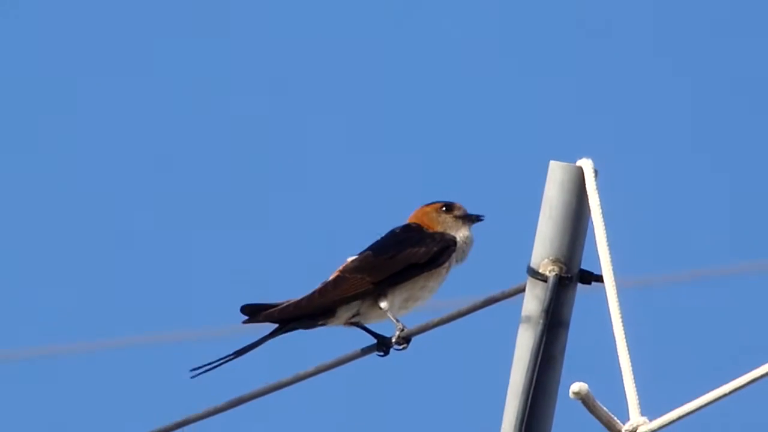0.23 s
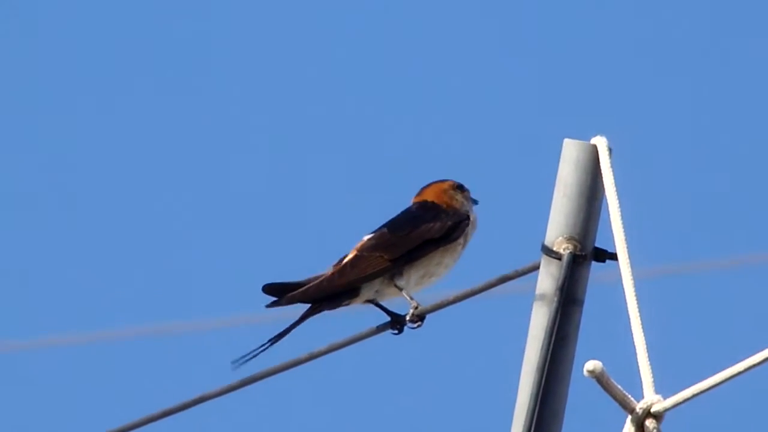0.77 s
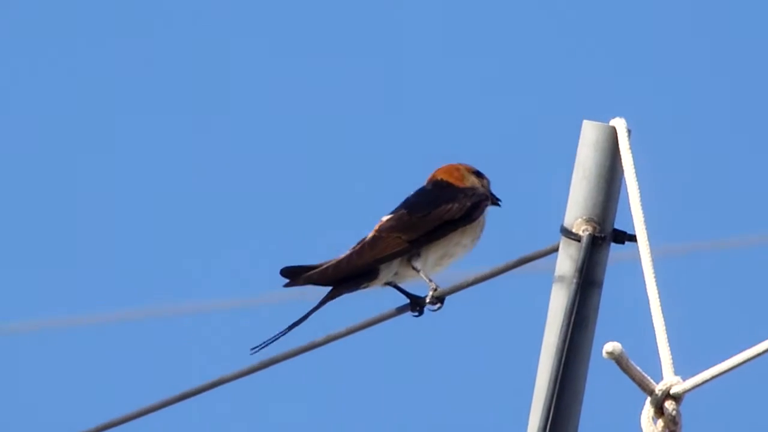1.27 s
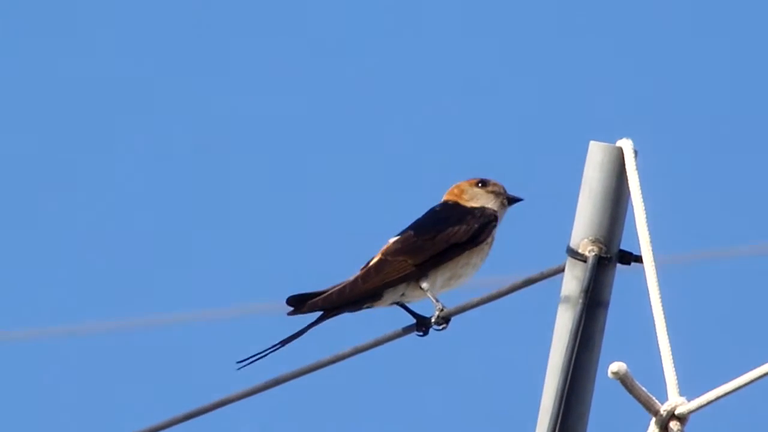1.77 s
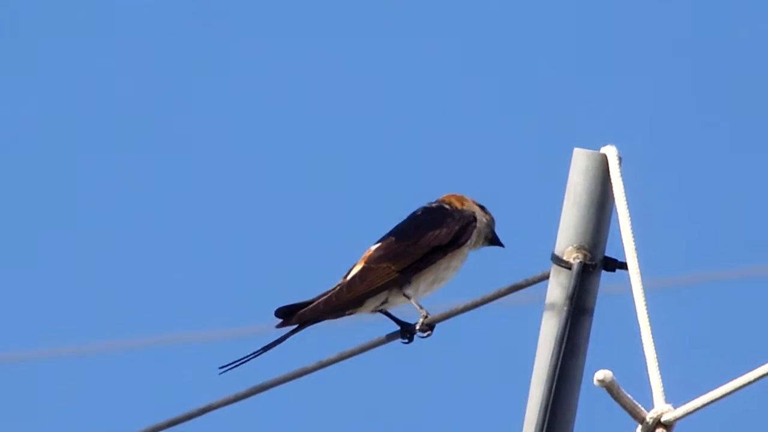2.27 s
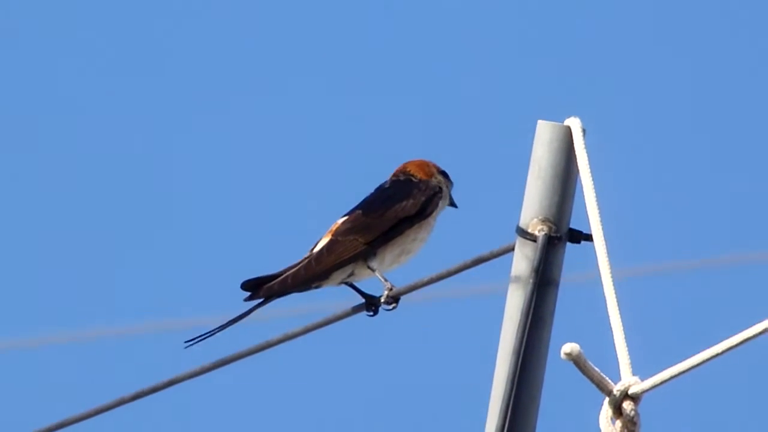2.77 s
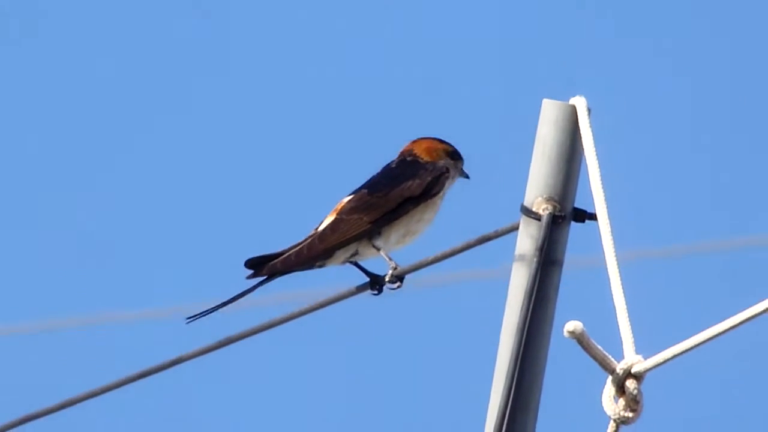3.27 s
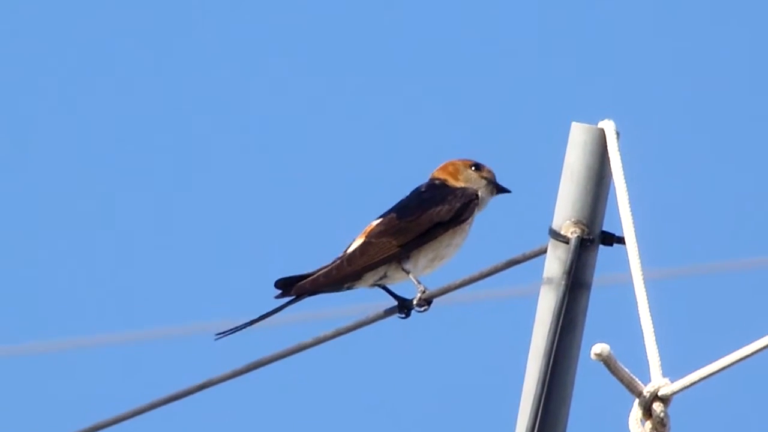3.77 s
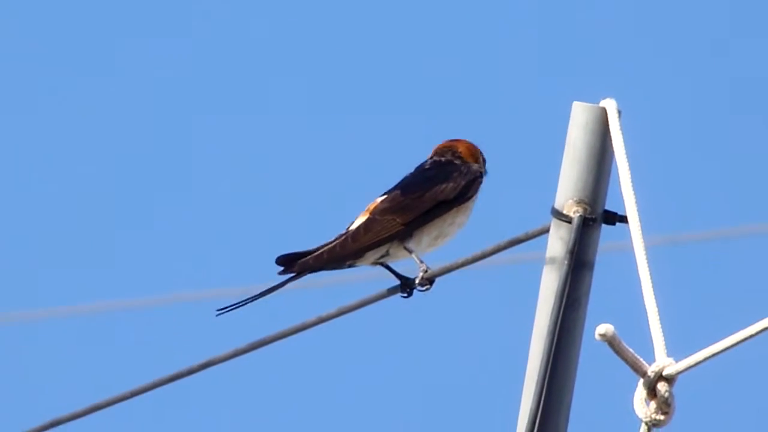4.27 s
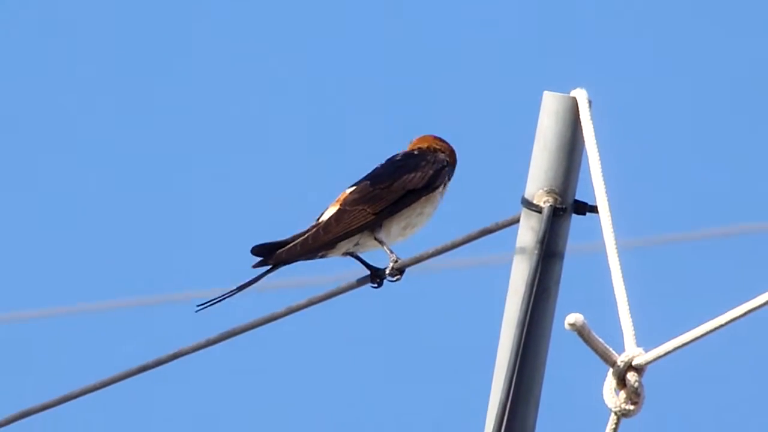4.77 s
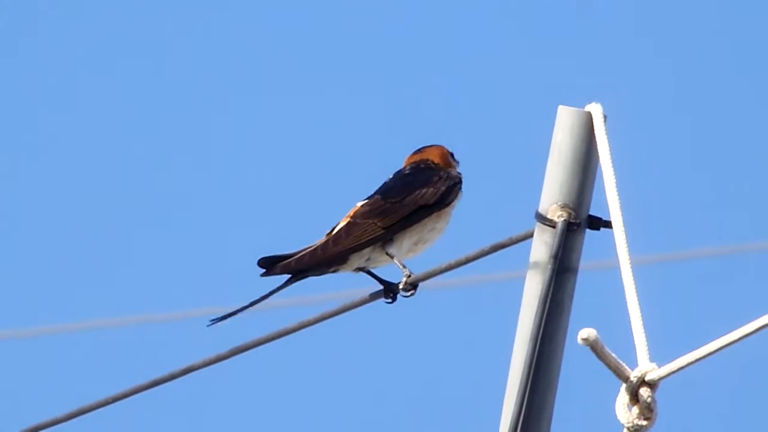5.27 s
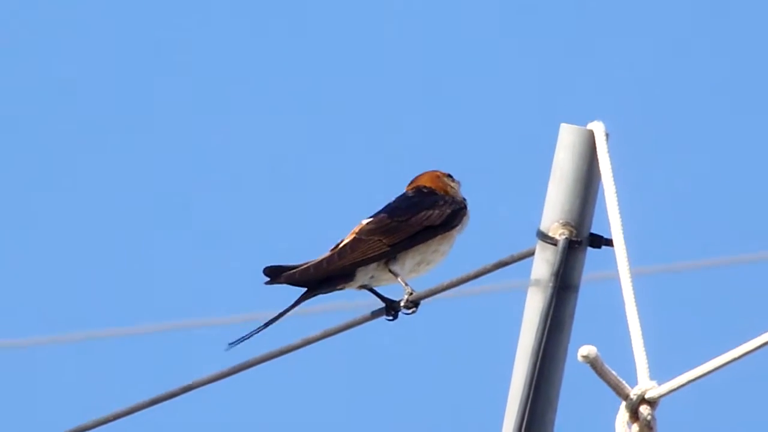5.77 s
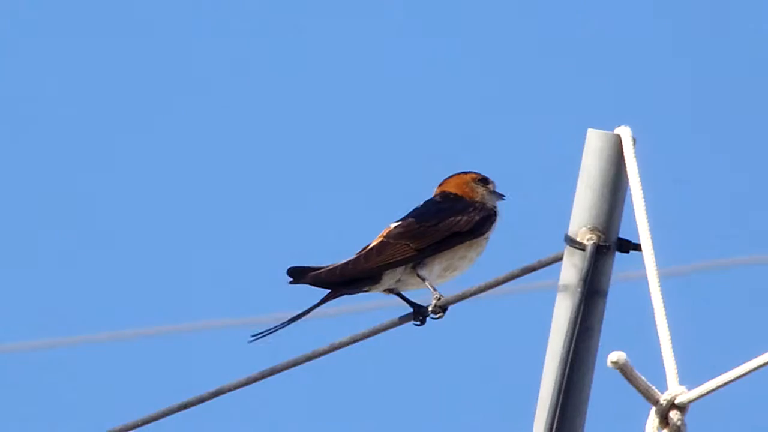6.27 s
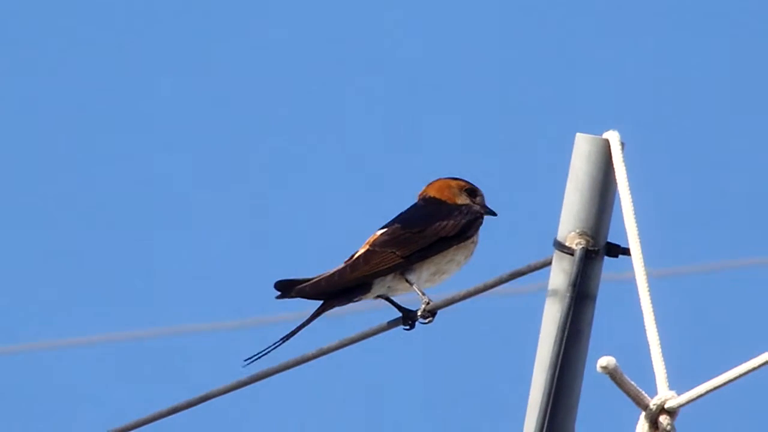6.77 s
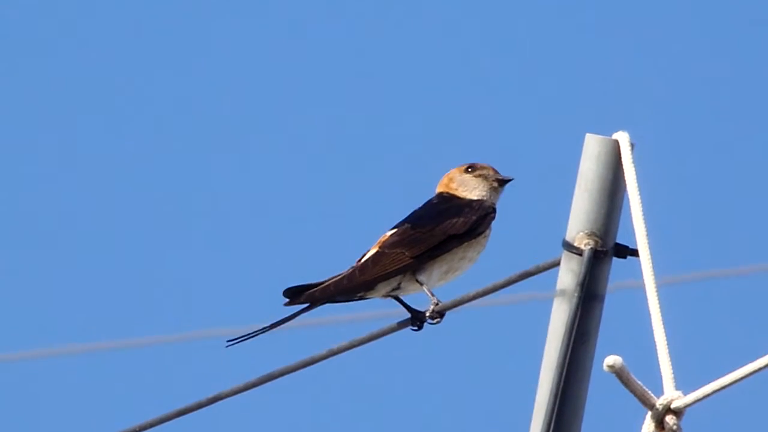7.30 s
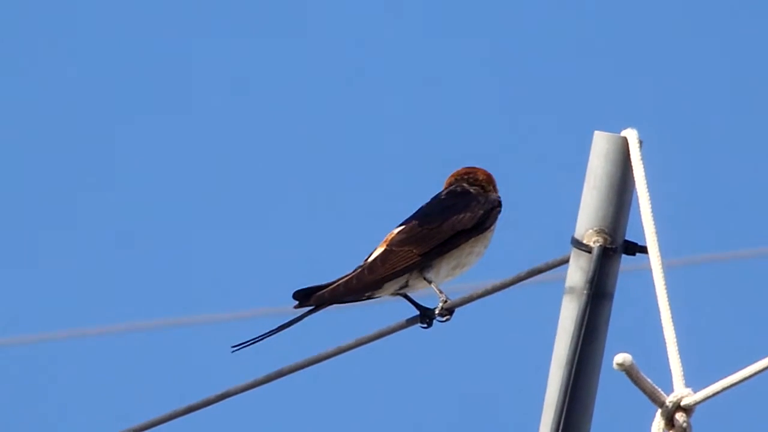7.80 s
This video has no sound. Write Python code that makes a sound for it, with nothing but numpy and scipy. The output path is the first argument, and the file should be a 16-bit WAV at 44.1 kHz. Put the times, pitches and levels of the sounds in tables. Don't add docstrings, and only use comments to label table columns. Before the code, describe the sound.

A swallow on a wire sings rising glides, nasal buzz, chirps and beak clicks, with faint birds beyond, over steady town hiss outdoors.

```python
import sys
import numpy as np
from scipy import signal
from scipy.fft import rfft, irfft
from scipy.io import wavfile
from scipy.ndimage import uniform_filter1d

SR = 44100
rng = np.random.default_rng(int(sys.argv[2]) if len(sys.argv) > 2 else 0)


def pcm_store(signal):
    levels = np.round(np.clip(np.atleast_2d(signal), -1, 1) * 32767)
    wavfile.write(sys.argv[1], SR, levels.astype(np.int16).T)


def volts_from_decibels(level):
    exponent = np.asarray(level, float) / 20
    return 10 ** exponent


N = 354563


def add(mix, s, sound):
    part = mix[round(s * SR):][:len(sound)]
    part += sound[:len(part)]


def evened(x):
    return x / np.sqrt(np.mean(x ** 2) + 1e-20)


def wobble(count, ms):
    size = max(int(ms * SR / 1000), 2)
    noise = rng.standard_normal(count + 2000)
    smooth = uniform_filter1d(uniform_filter1d(noise, size), size)
    return evened(smooth)[:count]


def unroll(rows):
    s, *columns = np.transpose(rows)
    t = np.arange(s[0], s[-1], 1 / SR)
    return [np.interp(t, s, column) for column in columns]


def voice(hz, partials, flutter_db=2.0, shake=0.0061, rasp=0.51):
    count = len(hz)
    turns = np.cumsum(hz * (1 + shake * wobble(count, 4.8))) / SR
    tone = np.zeros(count)
    for multiple, db in partials:
        level = volts_from_decibels(db + flutter_db * wobble(count, 3.4))
        tone += level * np.sin(2 * np.pi * multiple * turns)
    soft_ends = signal.windows.tukey(count, min(.1, 400 / count))
    return np.sqrt(2) * tone * (1 + rasp * wobble(count, .7)) * soft_ends


# time in seconds, pitch in Hz, level in dB.
GLIDE_FIRST_SIDE = [(0.205, 1016, -59), (0.287, 1187, -52), (0.325, 1210, -59), (0.355, 1273, -47),
                    (0.5, 1366, -51.5), (0.615, 1487, -50), (0.655, 1510, -51), (0.71, 1662, -48),
                    (0.8, 1695, -55)]
# time in seconds, pitch in Hz, level in dB.
GLIDE_SECOND_SIDE = [(0.24, 1520, -68), (0.254, 1533, -56), (0.37, 1728, -68), (0.544, 1865, -55.5),
                     (0.638, 1997, -67), (0.682, 2170, -49.5), (0.76, 2310, -67), (0.78, 2290, -51)]
# time in seconds, pitch in Hz, level in dB.
ARCH_LOWER_SIDE = [(4.72, 1015, -59), (4.754, 1728, -53), (4.77, 1964, -49.5), (4.816, 2135, -46.5),
                   (4.856, 2120, -69), (4.875, 2090, -43)]
# time in seconds, pitch in Hz, level in dB.
ARCH_UPPER_SIDE = [(4.755, 2160, -64), (4.767, 2480, -51), (4.793, 3270, -48.5), (4.818, 3400, -41.5),
                   (4.86, 3350, -74.5)]


def glide_and_arch():
    out = np.zeros(N)
    sides = [(GLIDE_FIRST_SIDE, (-19, 0, -14.5)), (GLIDE_SECOND_SIDE, (-4, -6)),
             (ARCH_LOWER_SIDE, (-3, -2)), (ARCH_UPPER_SIDE, (0,))]
    for rows, partials_db in sides:
        hz, db = unroll(rows)
        sung = voice(hz, enumerate(partials_db, 1), flutter_db=1.5, rasp=0.33)
        add(out, rows[0][0], volts_from_decibels(db) * sung)

    upper_start_s = ARCH_UPPER_SIDE[0][0]
    upper_hz, upper_db = unroll(ARCH_UPPER_SIDE)
    skipped = round((upper_start_s - ARCH_LOWER_SIDE[0][0]) * SR)
    lower_hz = unroll(ARCH_LOWER_SIDE)[0][skipped:]
    sum_hz = upper_hz + np.resize(lower_hz, len(upper_hz))
    add(out, upper_start_s, volts_from_decibels(upper_db - 18) * voice(sum_hz, [(1, 0)]))
    return out


# time in seconds, pitch in Hz, level in dB, mouth resonance in Hz.
NASAL_DRAWL = [(1.17, 563.5, -59, 3400), (1.206, 587.5, -57, 3500), (1.264, 572, -57, 3430),
               (1.3, 605, -54.5, 4250), (1.428, 596, -55, 4220), (1.455, 605, -48.5, 3680),
               (1.49, 610, -56, 3650), (1.516, 616, -64, 3650), (1.56, 597.5, -62, 3600)]
MOUTH_WIDTH_HZ, OFF_MOUTH_DB, TILT_DB_PER_PARTIAL = 360, -12.5, -0.5


def drawl():
    out = np.zeros(N)
    hz, db, mouth_hz = unroll(NASAL_DRAWL)
    partials = []
    for k in range(5, 11):
        away = 1 - np.exp(-((k * hz - mouth_hz) / MOUTH_WIDTH_HZ) ** 2)
        partials.append((k, (OFF_MOUTH_DB + TILT_DB_PER_PARTIAL * (k - 7)) * away))
    sung = voice(hz, partials, flutter_db=3.0, shake=0.0018, rasp=0.49)
    add(out, NASAL_DRAWL[0][0], volts_from_decibels(db) * sung)
    return out


# time in seconds, peak level in dB, ring in Hz.
BEAK_CLICKS = [
    (3.8068, -46, 3520),
    (3.9968, -39, 4500),
    (4.5195, -47, 4500),
    (4.8741, -37.5, 4400),
    (4.8755, -50, 6350),
    (4.876, -49, 2900),
    (5.6186, -47, 4680),
    (5.6754, -49, 4990),
]
# pitch in Hz, width in Hz, level in dB.
RATTLE_TONES = [(4600, 900, -4), (5800, 900, -2.5)]
RATTLE_START_S, KNOCKS_PER_S, JITTER_S = 6.4945, 32.05, 0.00062
RATTLE_TOP_S, RATTLE_DB, SAG_DB_PER_S, SPREAD_DB = 6.65, -44, 15, 2.5


def ring(hz, width_hz):
    u = np.arange(400) / SR * width_hz
    swell = (np.e * u * np.exp(-u / .5)) ** 2 * 4
    return np.sin(2 * np.pi * hz / width_hz * u) * swell


def beak(direct, to_walls):
    knocks = []
    for s, db, hz in BEAK_CLICKS:
        click = ring(hz, 560) + 0.42 * ring(1.27 * hz, 860) + 0.26 * ring(0.66 * hz, 900)
        knocks.append((s, db, click))
    rattle = sum(volts_from_decibels(db) * ring(hz, width_hz) for hz, width_hz, db in RATTLE_TONES)
    for s in RATTLE_START_S + np.arange(10) / KNOCKS_PER_S + JITTER_S * rng.standard_normal(10):
        sag_db = SAG_DB_PER_S * abs(s - RATTLE_TOP_S)
        knocks.append((s, RATTLE_DB - sag_db + SPREAD_DB * rng.standard_normal(), rattle))
    for s, db, knock in knocks:
        add(direct, s, volts_from_decibels(db + 2.8) * knock)
        add(to_walls, s, volts_from_decibels(db - 13.0) * knock)


# start in seconds, length in ms, start pitch in Hz, end pitch in Hz, level in dB.
FALLING_CHIPS = [(.031, 6, 10400, 9800, -61), (.037, 5, 11050, 9400, -52), (.04, 3.8, 6200, 4900, -40.5),
                 (.0485, 5.4, 4990, 4590, -31), (.049, 3, 9900, 9500, -54), (.895, 4, 5600, 2900, -42.5),
                 (.982, 7.3, 2700, 1980, -47), (4.074, 14.5, 5190, 4383, -46.5),
                 (4.088, 9.7, 4960, 4280, -46), (4.107, 6, 5830, 4930, -45), (4.119, 8.5, 5200, 4300, -35),
                 (4.14, 6.3, 5090, 4340, -48), (5.459, 9.4, 6160, 4800, -43), (5.913, 7.6, 2350, 2150, -53),
                 (6.156, 11.5, 2700, 2450, -53), (6.156, 13.4, 2100, 1950, -50),
                 (6.496, 7, 4800, 4250, -49)]
# start in seconds, length in ms, start pitch in Hz, end pitch in Hz, level in dB.
UPWARD_FLICKS = [(.775, 28, 1565, 2950, -46.5), (.9, 15.3, 2820, 3160, -36.5),
                 (.912, 15, 3110, 3410, -34.5), (2.482, 14, 5000, 5800, -59),
                 (4.736, 25, 2507, 3560, -47.5), (5.211, 30, 4300, 4750, -58),
                 (5.211, 15, 2450, 2660, -42.5), (5.221, 13, 2770, 3260, -39.5),
                 (5.322, 43, 3550, 4260, -51.5), (5.381, 24, 1840, 2070, -51), (5.395, 32, 4058, 4580, -54),
                 (5.397, 32, 2750, 3015, -44.5), (5.432, 5.6, 4270, 5300, -46),
                 (5.445, 18, 4430, 4700, -55.5), (5.808, 25, 1614, 2450, -51), (6.188, 26, 1838, 2170, -48),
                 (6.466, 6, 3800, 4200, -53)]
# start in seconds, length in ms, pitch in Hz, level in dB.
WHISTLES_FACING = [(0.011, 20, 4350, -50), (.69, 95, 1610, -61), (.8, 66, 3290, -58), (.873, 21, 2340, -52),
                   (.94, 93, 3084, -47), (1.155, 18, 4900, -57), (1.485, 21, 1845, -51.5),
                   (1.505, 29, 2870, -52), (3.855, 14, 2100, -58), (4.079, 11, 2860, -52),
                   (4.125, 12, 3190, -52), (4.89, 16, 3260, -57.5), (5.227, 35, 3410, -36),
                   (5.359, 28.7, 2890, -43), (5.472, 68, 2860, -60), (5.61, 60, 2095, -62),
                   (5.718, 82, 2883, -56), (5.862, 16, 2940, -52), (5.875, 28, 2180, -54),
                   (6.285, 130, 2894, -54.5), (6.398, 44, 2945, -52), (6.41, 22.4, 3370, -58)]
# start in seconds, length in ms, pitch in Hz, level in dB.
WHISTLES_AWAY = [(.744, 29, 2570, -49.5), (.95, 24, 1593, -52.5), (5.174, 41, 3945, -57.5),
                 (5.23, 12, 3710, -54), (5.232, 25, 6450, -63), (5.235, 25, 3115, -41),
                 (5.292, 72, 3400, -52.5), (5.702, 30, 2135, -54), (5.843, 12, 1850, -55),
                 (6.245, 32.4, 2580, -58.5), (7.545, 42, 3013, -56)]
# start in seconds, level in dB.
DISTANT_CALLS = [
    (2.497, -56),
    (3.645, -56.5),
    (3.81, -58.5),
    (5.625, -57.5),
    (5.8, -59),
    (7.13, -61.5),
    (7.325, -61),
]
HELD_RISE = 0.0065


def notes():
    rows = [(*row, -1) for row in FALLING_CHIPS]
    rows += [(*row, -3) for row in UPWARD_FLICKS]
    rows += [(s, 43.3, 3550, 2930, db, 3.5) for s, db in DISTANT_CALLS]
    for whistles, echo_db in ((WHISTLES_FACING, -6.5), (WHISTLES_AWAY, -2.5)):
        for s, ms, hz, db in whistles:
            rows.append((s, ms, hz * (1 - HELD_RISE), hz * (1 + HELD_RISE), db, echo_db))
    return rows


def short_notes(direct, to_walls):
    for s, ms, start_hz, end_hz, db, echo_db in notes():
        u = np.linspace(0, 1, round(ms * SR / 1000))
        hz = start_hz + (end_hz - start_hz) * u
        sung = evened(voice(hz, [(1, 0)], flutter_db=2.5, rasp=.28))
        note = volts_from_decibels(db) * sung * np.abs(np.sin(np.pi * u)) ** .45
        add(direct, s, note)
        add(to_walls, s, volts_from_decibels(echo_db) * note)


# start in seconds, length in ms, centre pitch in Hz, swing in Hz, level in dB.
HARSH_CHIRPS = [(.01, 25.4, 5000, 1000, -48), (1.25, 81, 4790, 350, -55), (1.3, 164, 4900, 1200, -62),
                (2.56, 57, 4600, 950, -51), (3.112, 30, 5100, 250, -60), (3.13, 107, 4100, 550, -59.5),
                (4.08, 71, 5240, 300, -52), (3.392, 64, 4480, 1010, -52.5), (5.47, 45, 5800, 600, -52),
                (5.63, 79, 3280, 400, -63), (5.799, 103, 2630, 700, -56), (6.1, 45, 4160, 900, -56),
                (6.17, 110, 2300, 496, -60), (6.3, 150, 4000, 600, -60.5), (6.5, 320, 5700, 1000, -60)]
CHIRP_FADE_DB, CHIRP_GRAIN_DB, CHIRP_RISE_S = -5, 2.5, 0.011


def harsh_chirps(direct, to_walls):
    for s, ms, hz, swing_hz, db in HARSH_CHIRPS:
        t = np.arange(round(ms * SR / 1000)) / SR
        u = t / t[-1]
        shake = signal.sawtooth(2 * np.pi * 85 * t + .8 * wobble(len(t), 8), .7)
        shaken_hz = (hz + swing_hz * shake) * (1 - .08 * u)
        sung = evened(voice(shaken_hz, [(0.95, 0)], flutter_db=CHIRP_GRAIN_DB))
        chirp = volts_from_decibels(db + CHIRP_FADE_DB * (u - .5)) * sung * np.minimum(t / CHIRP_RISE_S, 1)
        add(direct, s, .7 * chirp)
        add(to_walls, s, chirp)


def walls(x, t60=0.4, gap_s=.004):
    slots = np.arange(0, SR // 2, 40)
    at = slots + rng.integers(0, 40, len(slots))
    taps = np.zeros(SR)
    taps[at + round(gap_s * SR)] = rng.choice([-1., 1.], len(at)) * volts_from_decibels(-60 * at / SR / t60)
    return signal.oaconvolve(x, taps / np.linalg.norm(taps))[:N]


# frequency in Hz, level in dB per Hz.
TOWN_TONE = [(12, -9), (40, 0), (560, -16), (1200, -18), (2630, -23), (4480, -24), (7820, -32),
             (15700, -38)]
TOWN_DB = -48


def town_wash():
    frames, hz = N // 256 + 5, np.fft.rfftfreq(1024, 1 / SR)
    a, b, patches = rng.standard_normal((frames, 513, 3)).T
    patches = uniform_filter1d(patches, size=14, axis=0)
    patches = evened(uniform_filter1d(patches, size=16, axis=1))
    tone_hz, tone_db = np.transpose(TOWN_TONE)
    shape_db = np.interp(np.log(hz + 1), np.log(tone_hz), tone_db)[:, None]
    spectrum = (a + 1j * b) * volts_from_decibels(shape_db + 0.86 * patches)
    noise = signal.istft(spectrum, nperseg=1024, noverlap=768)[1][:N]
    return volts_from_decibels(TOWN_DB) * evened(noise)


# time in seconds, level in dB.
ENGINE_SWELLS = [
    (.15, -53),
    (1.0, -53),
    (1.7, -52),
    (3.3, -47.5),
    (4.9, -42),
    (6.07, -50),
    (7.0, -72),
    (8.04, -44),
]
SWELL_S, IDLE_DB = 0.091, -69


def engine_drone():
    t = np.arange(N) / SR
    load = volts_from_decibels(IDLE_DB) + np.zeros(N)
    for s, db in ENGINE_SWELLS:
        load += volts_from_decibels(db) * np.exp(-((t - s) / SWELL_S) ** 2 / 2)
    turns = np.cumsum(54 + 3.11 * wobble(N, 151)) / SR
    return volts_from_decibels(-4.5) * load * np.sin(2 * np.pi * turns)


def scene():
    song = glide_and_arch() + drawl()
    direct, to_walls = np.zeros((2, N))
    for play in (beak, short_notes, harsh_chirps):
        play(direct, to_walls)
    mono = song + direct + walls(to_walls + volts_from_decibels(-7) * song) + town_wash() + engine_drone()
    return np.array([mono, mono])


# pitch in Hz, level in dB.
ELECTRONIC_WHINE = [(15734, -86), (15704, -90), (15747, -90)]


def whine():
    t = np.arange(N) / SR
    return sum(np.sqrt(2) * volts_from_decibels(db) * np.sin(2 * np.pi * hz * t) for hz, db in ELECTRONIC_WHINE)


def splits(mono, count=25):
    side, hz = np.zeros(N), np.fft.rfftfreq(2048, 1 / SR)
    for s, centre_hz in rng.uniform((1.5, 6400), (7.8, 15200), (count, 2)):
        hiss = mono[round(s * SR) + 4096:][:2048]
        band = irfft(rfft(hiss) * (abs(hz - centre_hz) < 750))
        add(side, s - 1024 / SR, volts_from_decibels(-2.5) * band * np.hanning(2048))
    return side


def roll_off(x):
    return signal.sosfilt(signal.butter(12, 15850, fs=SR, output="sos"), x)


NOTCH_HZ, NOTCH_WIDTH_HZ, EDGE_HZ = 7790, 480, 15770


def record(dry):
    notch = signal.iirnotch(NOTCH_HZ, NOTCH_HZ / NOTCH_WIDTH_HZ, SR)
    heard = .93 * signal.lfilter(*notch, dry) + .07 * dry + whine()
    heard = heard + splits(heard[0]) * np.array([[1], [-1]])
    edge = signal.firwin(2047, EDGE_HZ, window=("kaiser", 9), fs=SR)
    return roll_off(signal.oaconvolve(heard, edge[None], "same"))


dry = scene()
out = record(dry)
pcm_store(out)
```